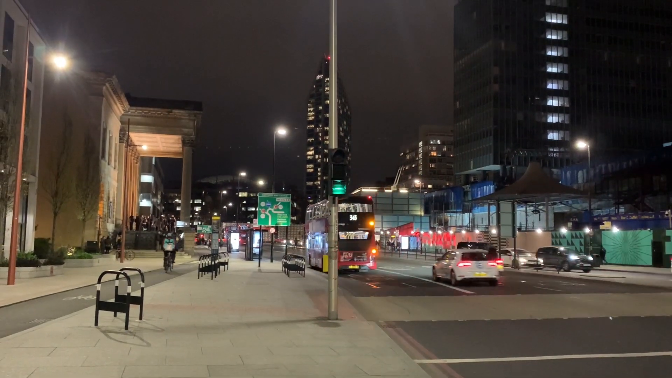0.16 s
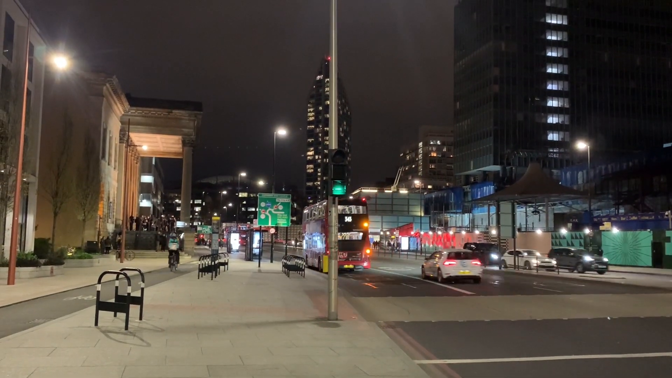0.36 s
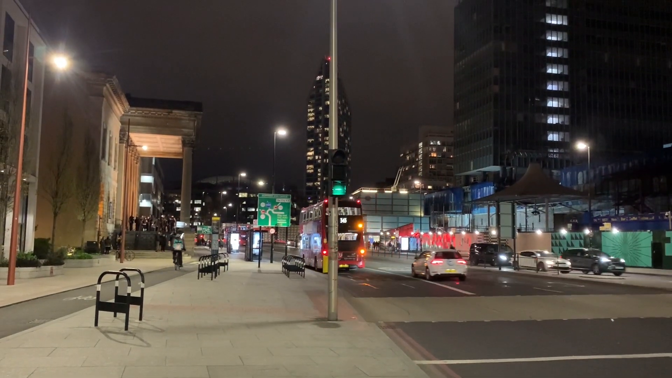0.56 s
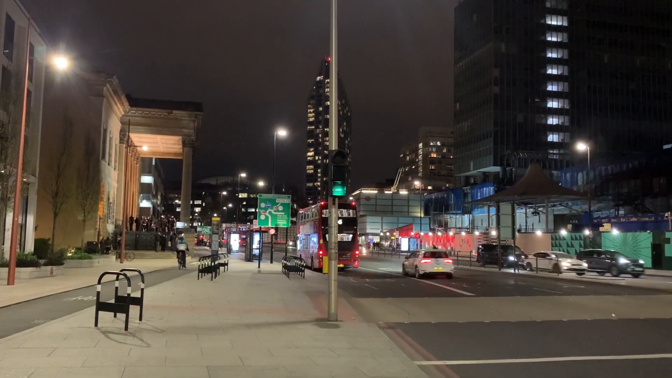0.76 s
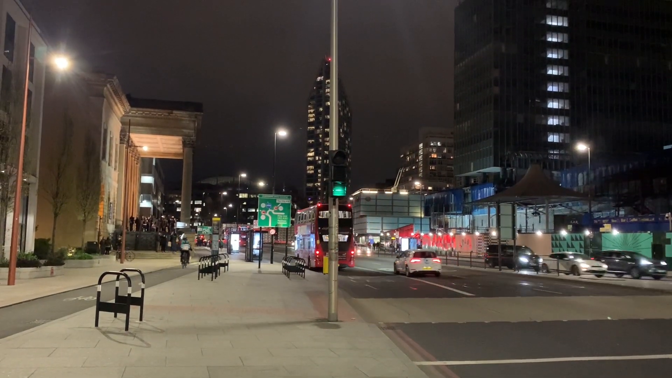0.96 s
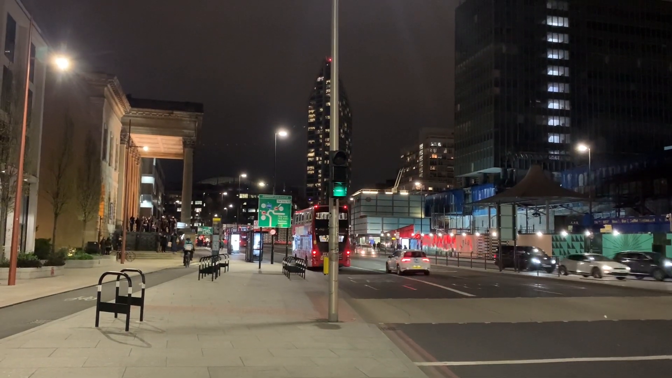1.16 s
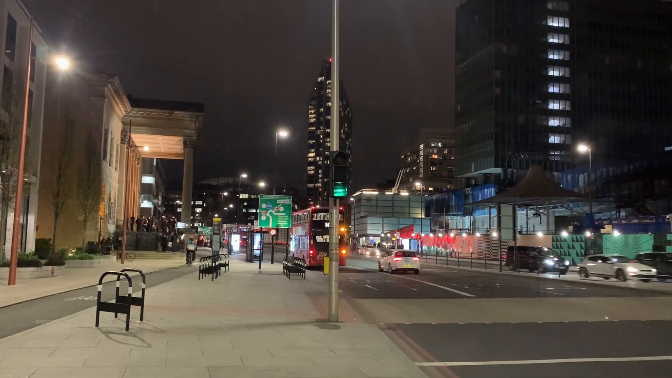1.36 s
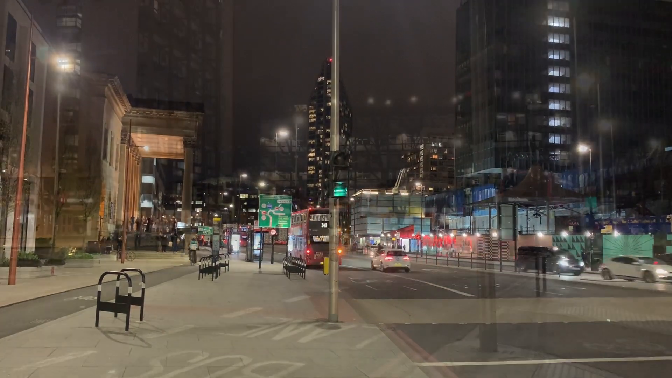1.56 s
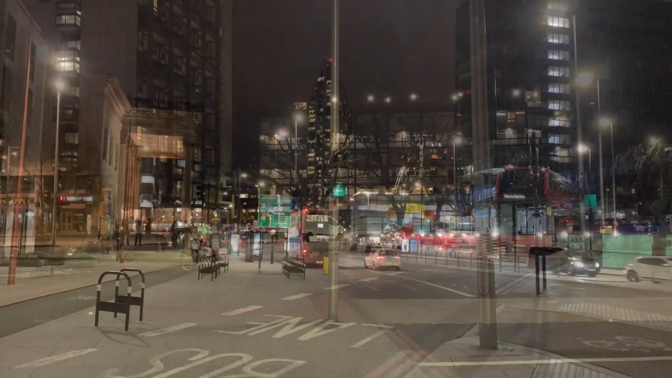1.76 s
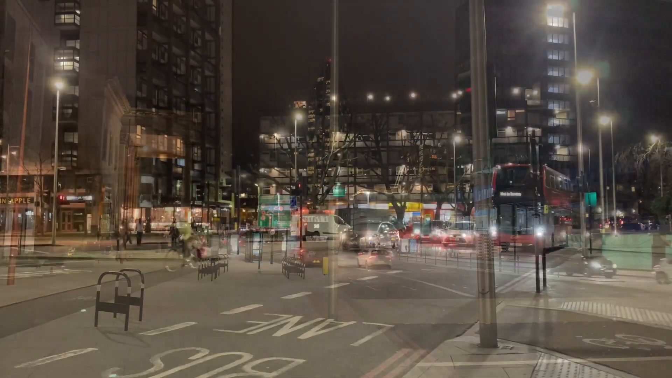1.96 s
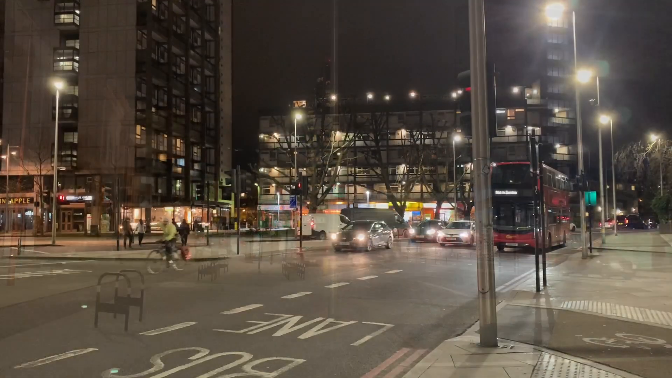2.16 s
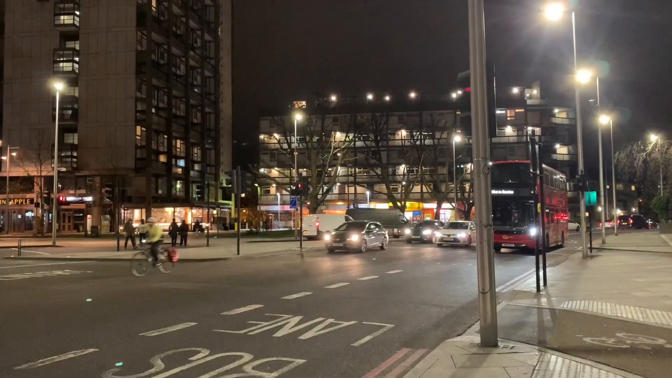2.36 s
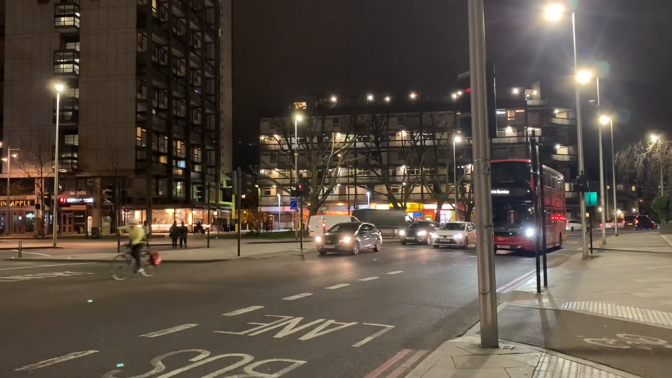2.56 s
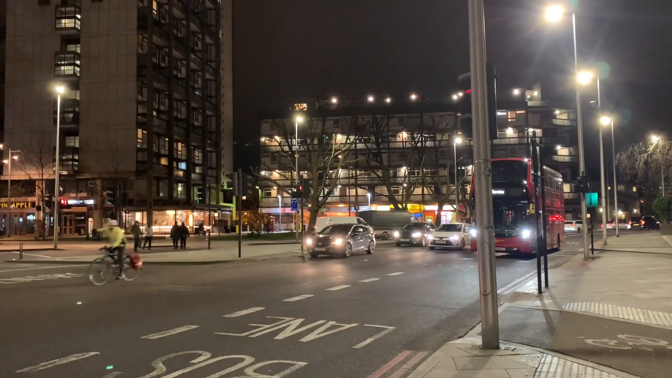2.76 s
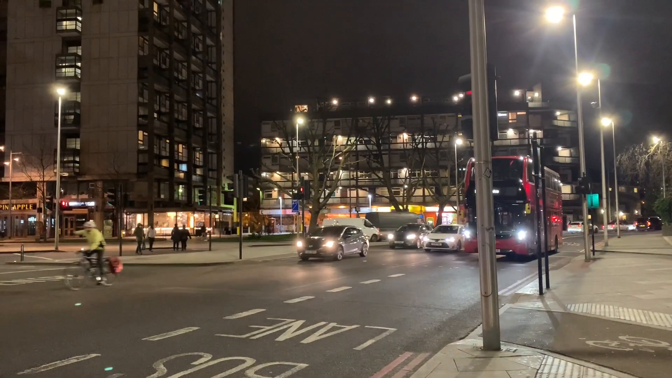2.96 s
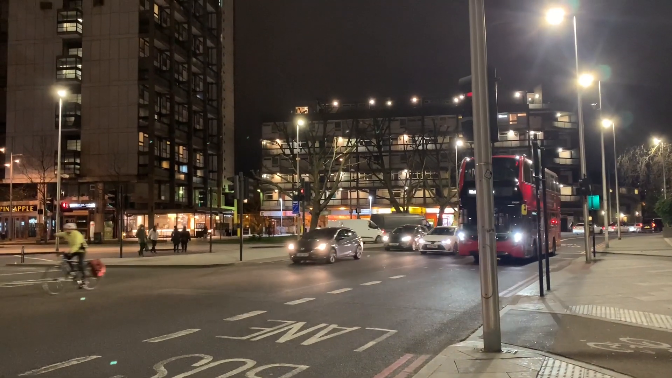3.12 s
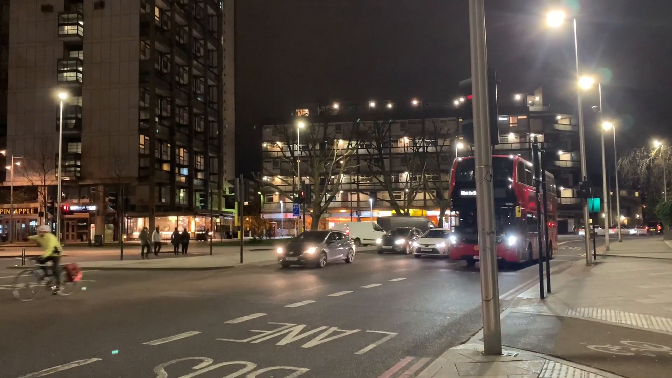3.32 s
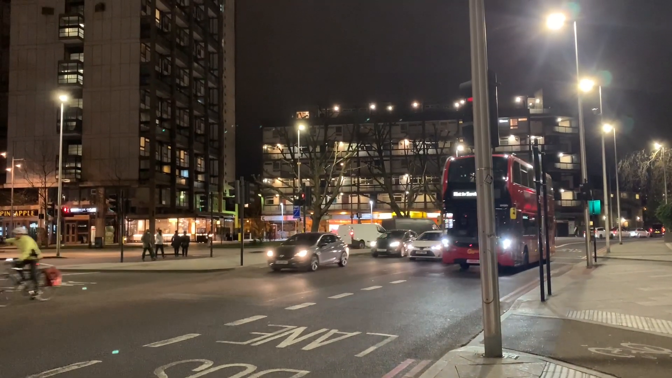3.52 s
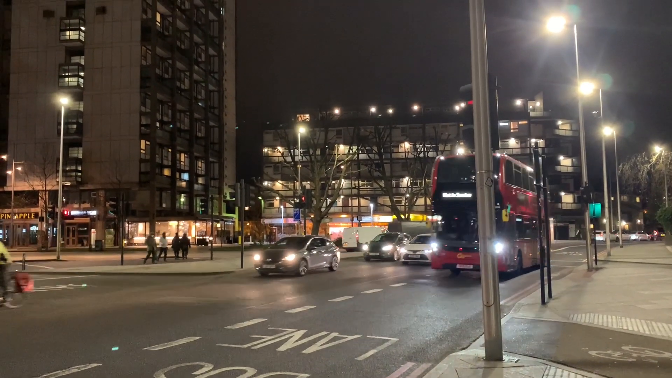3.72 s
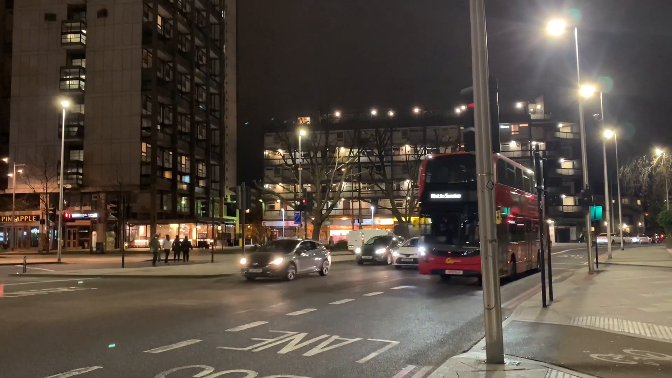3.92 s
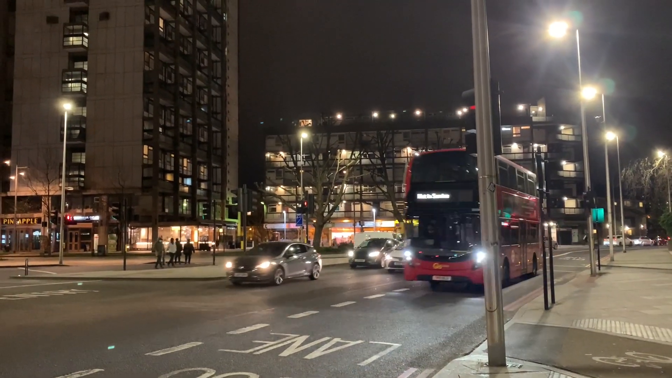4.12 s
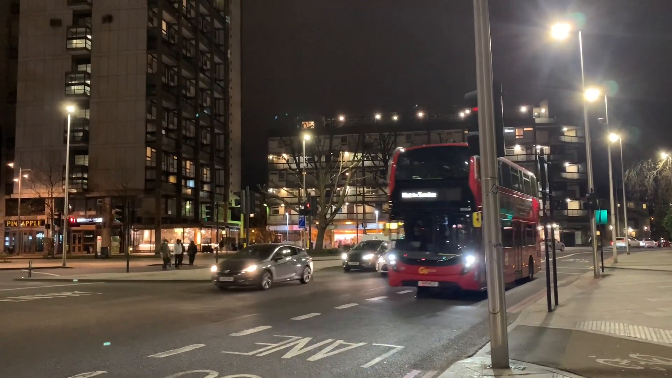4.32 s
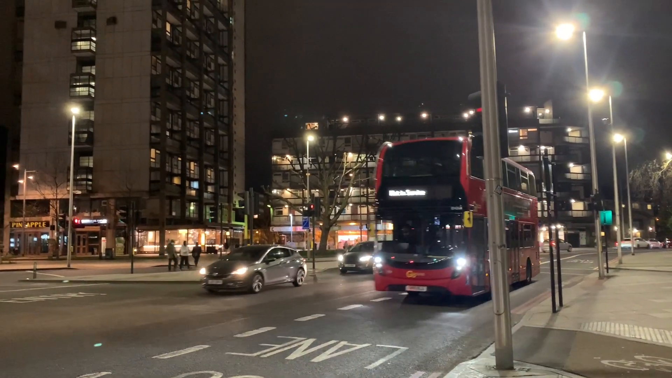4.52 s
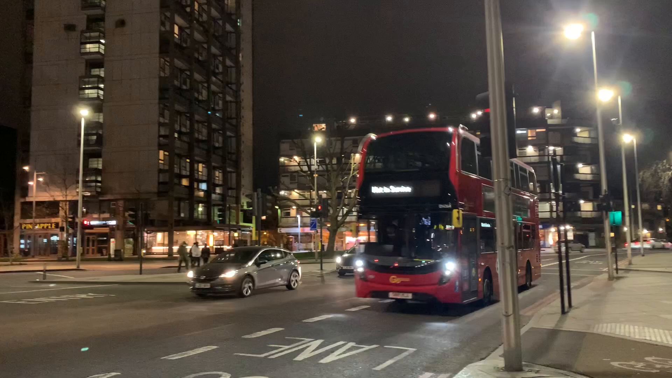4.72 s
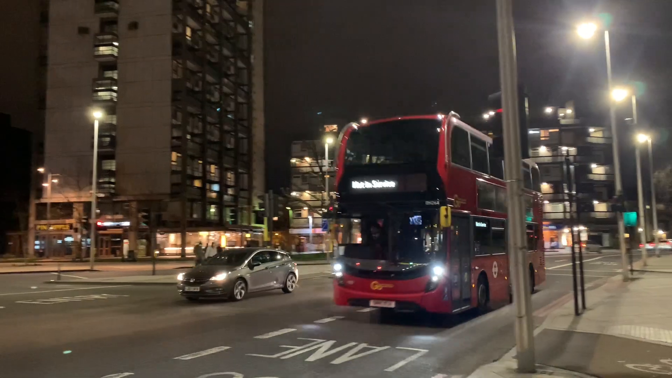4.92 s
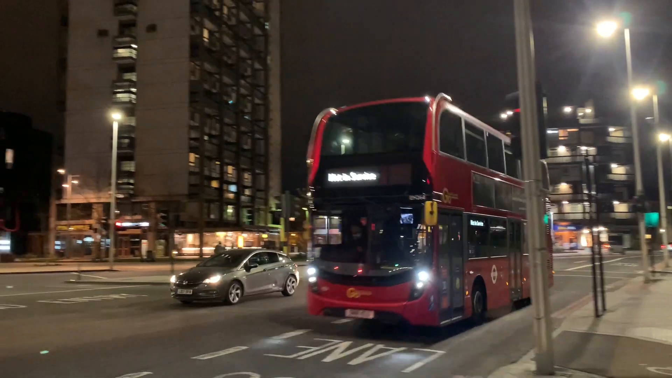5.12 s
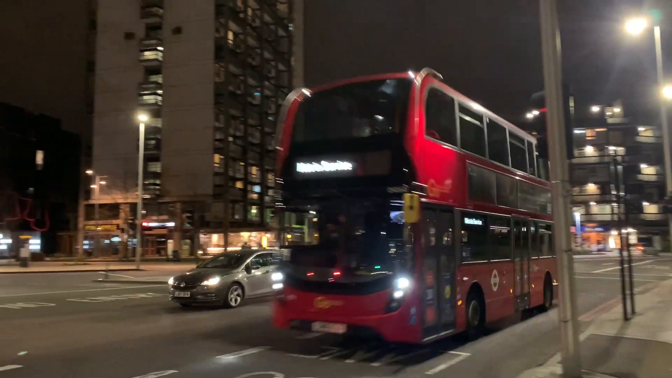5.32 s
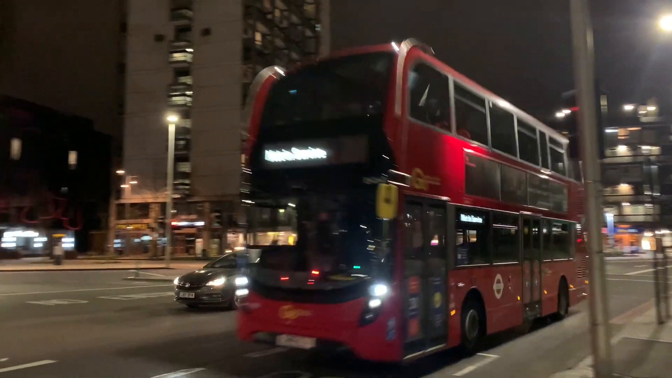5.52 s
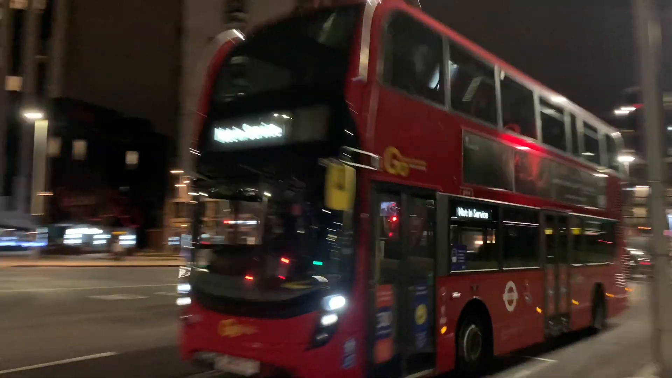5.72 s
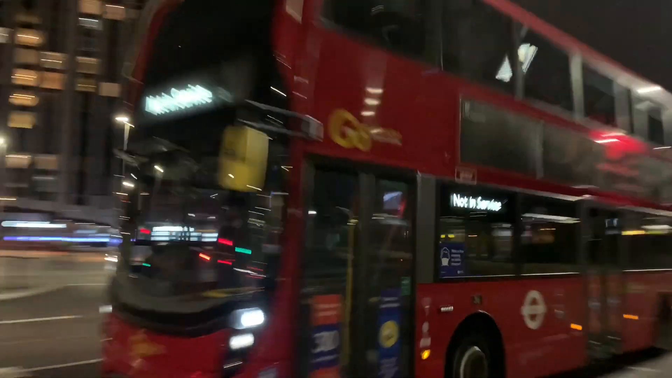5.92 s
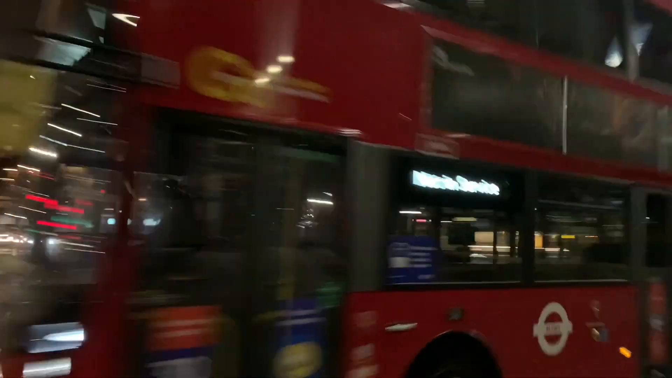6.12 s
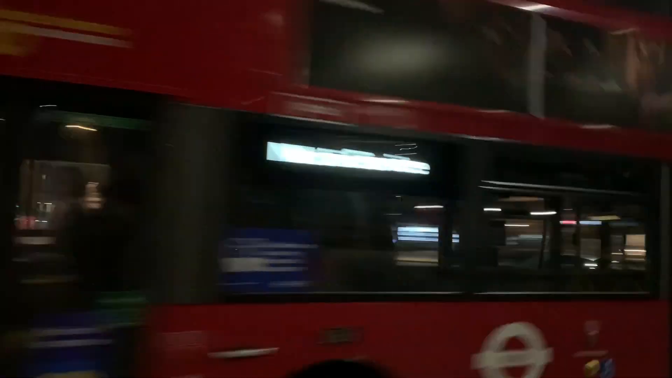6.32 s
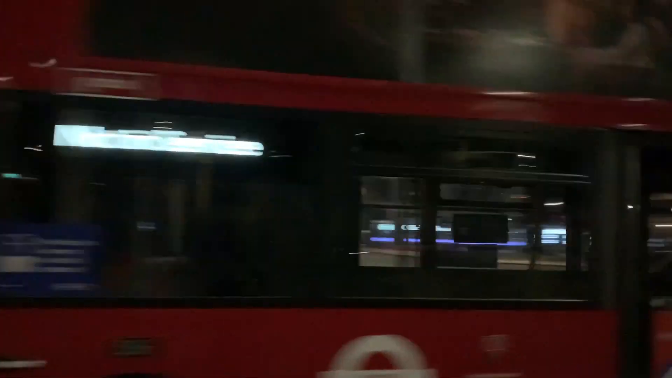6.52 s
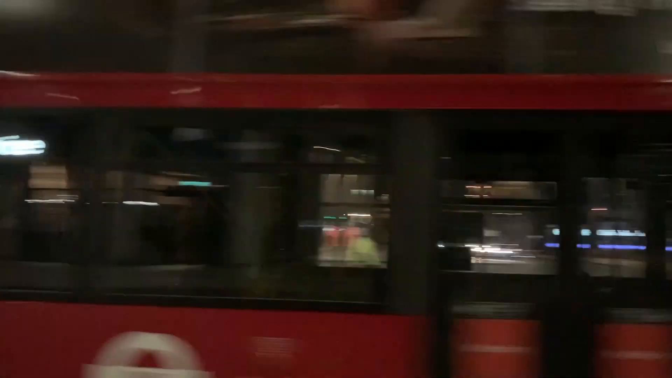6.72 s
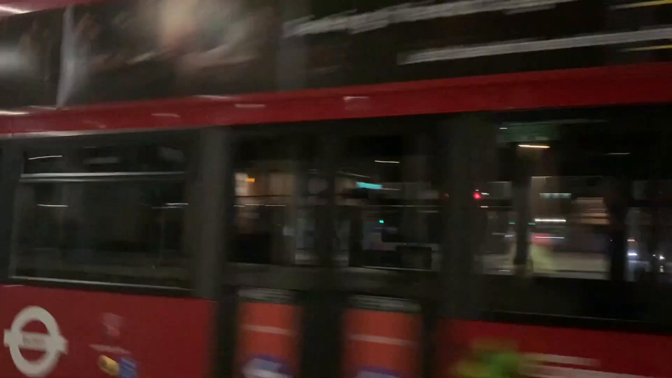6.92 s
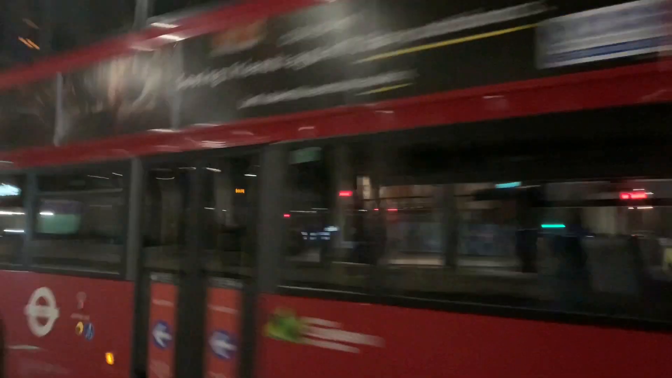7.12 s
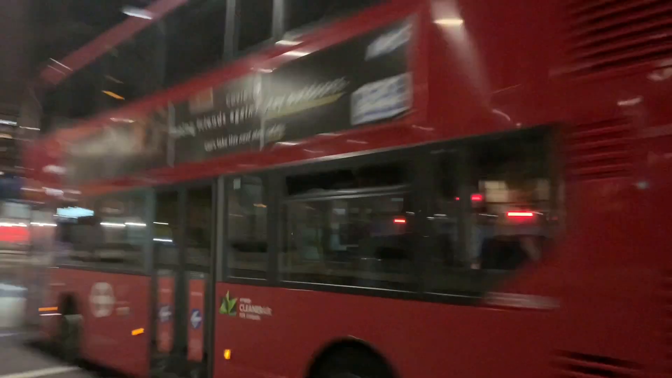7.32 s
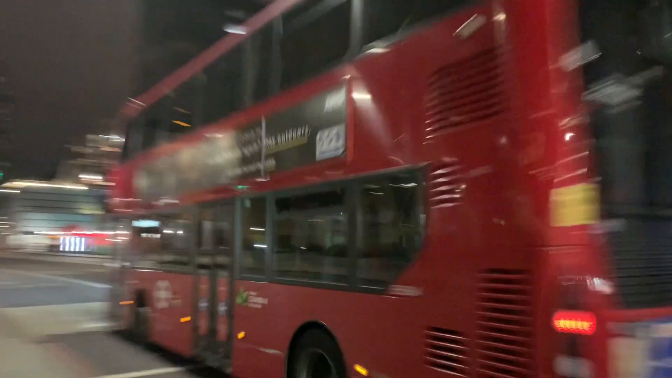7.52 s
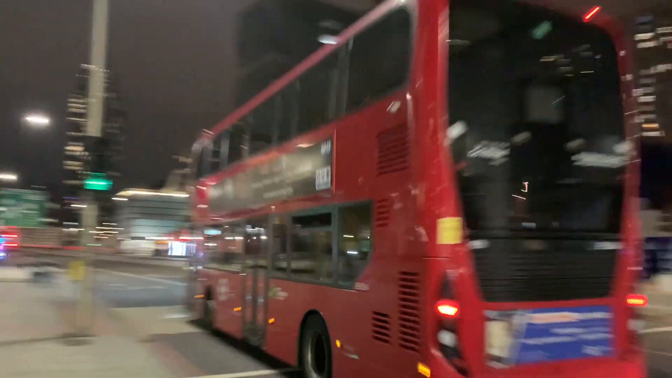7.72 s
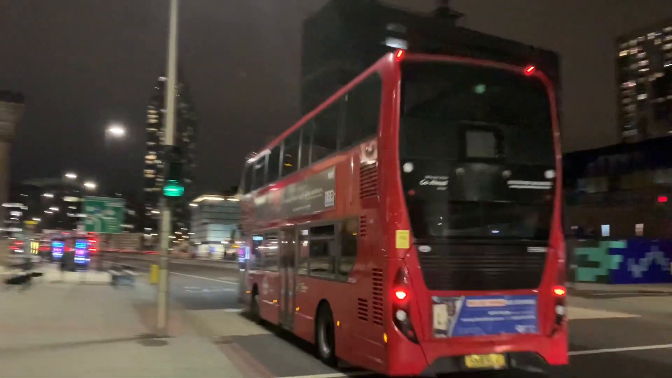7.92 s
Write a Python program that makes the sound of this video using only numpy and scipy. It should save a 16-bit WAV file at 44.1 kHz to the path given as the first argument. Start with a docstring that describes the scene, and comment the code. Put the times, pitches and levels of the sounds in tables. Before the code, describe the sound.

Steady diesel throb and wide traffic wash open the scene, with a faint squeal and a brief tyre swish. They fade under another street's softer drone, dotted with wind bumps and tiny handling clicks. A bus engine builds and a faint whine climbs; hard gusts buffet the phone microphone as the front passes. Body hum, rattly engine rasp and bright airy hiss follow close by, before the pitch sinks and the bus moves off.

```python
"""A double-decker bus comes from afar, gaining speed, and passes close by in a city street at night, its rear
engine last. Before it, a queue of traffic with a steady diesel fades away in another street; distant tyres drone.
Engines are stacks of wavering harmonics; tyres, rumble and hiss are shaped noise; whines are gliding tones.
Gusts thump on a phone's two microphone ports as swells of low noise; ticks and knocks sound nearby."""
import sys
import numpy as np
from scipy import signal
from scipy.fft import rfft, irfft, next_fast_len
from scipy.io import wavfile
from scipy.ndimage import uniform_filter1d, map_coordinates

SR = 44100
rng = np.random.default_rng(int(sys.argv[2]) if len(sys.argv) > 2 else 0)


def dump(signal):
    """Clip the signal to [-1, 1] and save it as 16-bit WAV at the path in sys.argv[1]."""
    limited = np.clip(np.atleast_2d(signal).T, -1, 1)
    pcm = np.round(limited * 32767).astype(np.int16)
    wavfile.write(sys.argv[1], SR, pcm)


N = 351477

# How alike left and right are in the waiting traffic: pitch_hz, likeness (0 to 1)
QUEUE_ALIKE = [(60, 0.96), (290, 0.82), (640, 0.33), (1400, 0.059), (3000, 0.055), (5600, 0.055),
               (6500, 0.83), (8500, 1), (15000, 0.96)]
# How alike left and right are in the bus noise: pitch_hz, likeness (0 to 1)
BUS_ALIKE = [(60, 0.87), (300, 0.98), (800, 0.82), (1200, 0.8), (1700, 0.77), (2400, 0.55), (4000, 0.39),
             (5500, 0.27), (6300, 0.81), (8500, 1), (15000, 0.83)]

# The front of the bus is abreast at FRONT_S, moving at this speed and gaining more, this far to the side
FRONT_S, SPEED_M_S, GAIN_M_S2, KERB_M = 5.964, 6.6, 0.73, 2.92
MONO_HZ = 6100  # above this the noise loses its own left-right lag and a fixed treble lag begins


def amp(db):
    """Turns decibels into a gain."""
    return 10 ** (np.asarray(db) / 20)


def unit(x):
    """Scales a signal to an rms of 1."""
    return x / np.sqrt(np.mean(x ** 2) + 1e-20)


def clock():
    """The time of every sample in seconds."""
    return np.arange(N) / SR


def along(points, hz):
    """Reads a curve of (Hz, value) points on a log pitch axis."""
    f, v = np.transpose(points)
    return np.interp(np.log(hz + 1), np.log(f + 1), v)


def curves(rows, fade):
    """Joins timed rows into curves, led by a gate that opens and closes just outside the rows' span."""
    s, *columns = np.transpose(rows)
    t = clock()
    gate = np.clip(1 + np.minimum(t - s[0], s[-1] - t) / fade, 0, 1)
    return [gate] + [np.interp(t, s, column) for column in columns]


def wobble(rate):
    """A smooth random curve with this many random points a second."""
    points = rng.standard_normal(int(N * rate / SR) + 4)
    return map_coordinates(points, [np.arange(N) * rate / SR])


def ramp(start, end):
    """Rises from 0 to 1 between two times."""
    return np.clip((clock() - start) / (end - start), 0, 1)


def bell(middle, half):
    """A flat-topped swell around a time."""
    return np.exp(-((clock() - middle) / half) ** 4)


def filtered(x, response):
    """Multiplies the spectrum of x by a response that depends on frequency."""
    m = next_fast_len(N + 8192)
    return irfft(rfft(x, m) * response(np.fft.rfftfreq(m, 1 / SR)), m)[..., :N]


def lagging(hz):
    """Every note lags as if higher, by an amount that grows to 500 Hz above a 150 Hz knee."""
    return hz + 500 * hz / (hz + 150)


def half_lag(hz, lag):
    """Half the phase by which left trails right; lag lists time_s, lag_ms."""
    return np.pi * lagging(hz) * np.interp(clock(), *np.transpose(lag)) / 1000


def rush(spectrum, alike, lag, patchy_db):
    """Stereo noise of rms 1, shaped in pitch, with patches of random gain; left hears it late by lag."""
    hz, t, (a, b) = signal.stft(rng.standard_normal((2, N)), SR, nperseg=1024)
    patches = uniform_filter1d(uniform_filter1d(rng.standard_normal(a.shape), 4, 0), 6, 1)
    # Two independent noises are mixed as middle and side for the wanted likeness
    turn = np.arccos(np.clip(along(alike, hz), -1, 1))[:, None] / 2
    mid, side = a * np.cos(turn), b * np.sin(turn)
    lag_s = np.interp(t, *np.transpose(lag)) / 1000
    late = np.exp(-1j * np.pi * np.outer(lagging(hz) * (hz < MONO_HZ), lag_s))
    pair = amp(patchy_db * unit(patches)) * np.array([(mid + side) * late, (mid - side) / late])
    noise = signal.istft(pair, SR, nperseg=1024)[1][:, :N]
    return unit(filtered(noise, lambda f: amp(along(spectrum, f))))


def diesel(firing_hz, orders, waver_db, drift, lag):
    """Harmonics of the firing rate, the higher wavering more as echoes off the street shift."""
    turns = np.cumsum(firing_hz) / SR
    total = 0
    for k, db in orders:
        level = amp(db + waver_db * np.sqrt(k) * wobble(5.7))
        phase = 2 * np.pi * k * turns + drift * k * wobble(5)
        total = total + level * np.sin(phase + np.outer([-1, 1], half_lag(k * firing_hz, lag)))
    return total * np.sqrt(2)


def whine(hz, waver_db, blur_hz, lag):
    """A tone on a pitch curve, wavering in level and blurred by fast random pitch drift."""
    phase = 2 * np.pi * np.cumsum(hz + blur_hz * wobble(400)) / SR
    return amp(waver_db * wobble(11)) * np.sin(phase + np.outer([-1, 1], half_lag(hz, lag)))


def glides(rows, waver_db, blur_hz, lag=((0, 0),)):
    """Tones that swell, glide evenly and fade."""
    total = 0
    for middle, half, hz, slope, db in rows:
        pitch = hz + slope * (clock() - middle)
        total = total + amp(db) * bell(middle, half) * whine(pitch, waver_db, blur_hz, lag)
    return total


def far():
    """Distant tyres on tarmac, strongest in one band, where tread tones waver."""
    # Distant traffic nears, then is hidden by the bus: time_s, level_db
    far_level = [(2, -49.5), (5, -45), (6.2, -39.5), (6.8, -66)]
    # Tyre noise spectrum: pitch_hz, level_db (per Hz)
    far_roar = [(700, -35), (1000, 4.5), (1300, -25), (1530, 0), (1650, 0), (1770, 1.5), (1860, -8.5),
                (2050, -4), (2400, -5), (2700, -12), (4000, -15.5), (6500, -25), (9000, -42)]
    # Left-right likeness: pitch_hz, likeness (0 to 1)
    far_alike = [(1000, 0.42), (1700, 0.48), (2500, 0.56), (5600, 0.14), (6500, 1)]
    # Tread tones in the drone: pitch_hz, level_db (against the roar)
    tread_tones = [(1520, -13), (1660, -7), (1760, -11)]
    gate, db = curves(far_level, fade=0.55)
    drone = rush(far_roar, far_alike, [(0, 0.043)], patchy_db=1.5)
    for hz, level in tread_tones:
        drone = drone + amp(level) * whine(hz + 35 * wobble(3), waver_db=4, blur_hz=40, lag=[(0, .036)])
    return gate * amp(db + [[1], [0]]) * drone


def queue_engine(firing_hz):
    """A steady diesel, whose single harmonics swell for a while, beats with a second close in pitch."""
    # Harmonics: multiple (of the firing rate), level_db
    queue_orders = [(1, -4), (2, -3.5), (3, -7), (4, -8), (5, -12), (6, -14.5), (7, -20), (8, -21.5),
                    (9, -17)]
    # Harmonics that swell: middle_s, half_length_s, pitch_hz, glide_hz_per_s, level_db
    swells = [(1.02, .24, 115.5, 0, -26), (.47, .08, 403, 0, -34), (.82, .07, 404, 0, -33),
              (1.08, .1, 402, 0, -33), (1.36, .15, 401, 0, -32), (1.05, .1, 460, 0, -39),
              (1.32, .08, 458, 0, -38), (.9, .1, 290, 0, -36), (1.0, .3, 172, 0, -33)]
    # A second exhaust: middle_s, half_length_s, pitch_hz, glide_hz_per_s, level_db
    second_exhaust = [(.55, 0.28, 51.64, 0.097, -18.5), (1.33, 0.26, 53.2, 1.53, -21.5)]
    steady = diesel(np.full(N, firing_hz), queue_orders, waver_db=1.26, drift=0.28, lag=[(0, 0)])
    sound = amp(-29.5) * steady
    sound += glides(swells, waver_db=2.5, blur_hz=3.3)
    return sound + glides(second_exhaust, waver_db=1.5, blur_hz=2)


def queue_noise(firing_hz):
    """The wide roar of waiting traffic: low rumble, tyres and hiss, and one car's tyres sweeping by."""
    # Noise spectra, each: pitch_hz, level_db (per Hz)
    low_band = [(15, -39), (25, 2), (43, -3.5), (64, 10.5), (85, -1.5), (114, 5), (500, -9.5), (650, -37),
                (1100, -120)]
    tyre_band = [(250, -38.5), (400, -20), (600, -1.5), (1000, -7.5), (1600, -10.5), (1750, -14),
                 (1950, -8.5), (2200, -16), (2600, -19), (3300, -20), (3700, -23), (5000, -37), (7000, -80)]
    hiss_band = [(3000, -24), (4200, -2), (6000, -8.5), (8500, -6), (11000, -16), (12400, -12.5),
                 (13300, -27), (16000, -15)]
    swish_band = [(1400, -32), (1900, 2), (2200, 3), (2400, 5), (2620, 5), (2780, -14), (3600, -39)]
    t = clock()
    knock = 1 + 0.1 * np.sin(2 * np.pi * firing_hz * t)  # each firing swells the tyre noise
    tyres = amp(-30.5 - 0.82 * t) * amp([[.5], [-.5]]) * knock
    sound = amp(-25.5) * rush(low_band, QUEUE_ALIKE, [(0, 0.0087)], patchy_db=2.0)
    sound += tyres * rush(tyre_band, QUEUE_ALIKE, [(0, 0.13)], patchy_db=2.0)
    sound += amp(-47.6 - 4.3 * t) * rush(hiss_band, QUEUE_ALIKE, [(0, 0.018)], patchy_db=1.5)
    swish = amp(-39.5) * bell(.68, 0.17)
    return sound + swish * rush(swish_band, QUEUE_ALIKE, [(0, 0.096)], patchy_db=2.5)


def queue():
    """Waiting traffic: diesel tones over a wide, diffuse roar, with a faint gliding squeal."""
    # The squeal rises and settles: middle_s, half_length_s, pitch_hz, glide_hz_per_s, level_db
    squeal = [(.12, .15, 3160, 350, -46), (.5, .28, 3210, 50, -51), (1.1, .06, 3100, 600, -53)]
    firing_hz = 57.13
    sound = queue_engine(firing_hz) + queue_noise(firing_hz)
    return sound + glides(squeal, waver_db=1.5, blur_hz=45) * amp([[1], [-4]])


def thumps():
    """Gusts are short swells of low turbulence, partly unlike in the two ports; harder ones are brighter."""
    # Gusts on the microphones: middle_s, level_db, length_s
    gusts = [(2.35, -25.5, 0.029), (2.539, -21.5, 0.023), (2.607, -28, 0.07), (2.818, -25, 0.04),
             (3.529, -21.5, 0.02), (3.69, -17.5, 0.057), (3.86, -28, 0.13), (4.17, -29.5, 0.05),
             (4.797, -33, 0.05), (6.024, -21, 0.037), (6.129, -15, 0.027), (6.173, -10.5, 0.03),
             (6.219, -12, 0.044), (6.277, -14.5, 0.044), (6.362, -20, 0.034), (6.534, -16.5, .04),
             (6.899, -17, 0.039)]
    # Turbulence spectrum: pitch_hz, level_db (per Hz)
    gust_band = [(20, -58), (38, -9), (55, 12.5), (100, 1), (200, -3), (330, -12.5), (450, -23), (600, -46),
                 (900, -101)]
    brightens_hz = 44.7  # at full scale a gust gains 6 dB an octave above this
    t = clock()
    air = rush(gust_band, [(60, .8), (400, .7)], [(0, 0)], patchy_db=0)
    # Even out the strength within a gust
    power = np.abs(uniform_filter1d(np.mean(air ** 2, 0), SR // 25))
    air = air / np.sqrt(power + 0.029)
    gust = sum(amp(db) * np.exp(-((t - s) / length) ** 2 * 2) for s, db, length in gusts)
    bright = np.gradient(air, axis=1) * SR / (2 * np.pi * brightens_hz)
    return gust * (air + gust * bright)


def ticks():
    """Each tick is a dying puff of noise in one band."""
    # Ticks: start_s, level_db, pitch_hz, width_hz, t60_s (time to die by 60 dB)
    tick_rows = [(2.085, -52, 12400, 1500, .04), (2.087, -55, 15300, 900, .03),
                 (2.18, -61, 9800, 610, 0.085), (2.183, -63, 12400, 900, 0.3), (2.36, -65, 12500, 900, .12),
                 (2.779, -53, 10000, 6000, .008), (2.98, -64, 11900, 600, .2),
                 (3.517, -53, 9500, 4012, .01)]
    out, t = np.zeros(N + SR), np.arange(SR // 5) / SR
    f = np.fft.rfftfreq(len(t), 1 / SR)
    for s, db, hz, width_hz, t60 in tick_rows:
        band = np.exp(-((f - hz) / width_hz) ** 2 * 2)
        puff = unit(irfft(rfft(rng.standard_normal(len(t))) * band, len(t)))
        onset = 1 - np.exp(-t / (0.063 * t60))
        out[round(s * SR):][:len(t)] += amp(db - 60 * t / t60) * onset * puff
    # The right copy starts a little later, before the treble lag is applied
    return np.array([out[:N], np.roll(out, 9)[:N]])


def knocks():
    """Each small dull knock rings two short modes, a little differently in pitch each time."""
    # Knocks: start_s, level_db
    knock_rows = [(.977, -18), (1.015, -17), (2.37, -24), (2.566, -18), (5.506, -15), (5.591, -15)]
    # Modes: pitch_hz (before the random shift), level_db, t60_s (time to die by 60 dB)
    modes = [(790, 0, .016), (2100, -8, .012)]
    out, t = np.zeros(N + SR), np.arange(SR // 20) / SR
    shifts = rng.standard_normal((len(knock_rows), 2))
    for (s, db), pair in zip(knock_rows, shifts):
        ring = 0
        for (hz, level, t60), shift in zip(modes, pair):
            pitch = hz * (1 + .04 * shift)
            ring = ring + amp(level - 60 * t / t60) * np.sin(2 * np.pi * pitch * t)
        out[round(s * SR):][:len(t)] += amp(db) * (1 - np.exp(-t / .001)) * ring
    return np.array([out[:N], np.roll(out, 4)[:N]])  # the right copy starts slightly later


def travelled(t):
    """Metres by which the front of the bus has passed, under steady acceleration."""
    return SPEED_M_S * (t - FRONT_S) + GAIN_M_S2 / 2 * (t - FRONT_S) ** 2


def passing(spots):
    """Gain of a layer from spots along the bus: behind_front_m, abreast_db, loss_db (per doubled distance)."""
    front = travelled(clock())
    power = 0
    for m, db, loss_db in spots:
        distance = np.hypot(1, (front - m) / KERB_M)
        power = power + amp(db - loss_db * np.log2(distance)) ** 2
    return np.sqrt(power)


def bearing():
    """Rows of time_s, lag_ms: left lags most while the middle of the bus is abreast."""
    ahead_ms, abreast_ms, behind_ms = 0.089, 0.21, 0.017
    abreast_m, swing_m = 6.5, 3.9
    t = np.linspace(0, N / SR, num=81)
    past = (travelled(t) - abreast_m) / swing_m
    away = np.where(past < 0, ahead_ms, behind_ms)
    return np.transpose([t, away + (abreast_ms - away) * np.exp(-past ** 2)])


def motor():
    """The drive motor's two thin whines, locked to one shaft as it speeds up."""
    # Shaft whines: time_s, lower_pitch_hz, lower_level_db, upper_level_db
    motor_rows = [(3.35, 3700, -68, -82), (3.72, 3980, -67, -80), (3.82, 4070, -76, -79),
                  (3.88, 4125, -58, -78), (4.03, 4260, -64, -78), (4.15, 4370, -58, -78),
                  (4.3, 4520, -64, -76), (4.68, 4825, -64, -74), (4.8, 4890, -75, -70),
                  (5.1, 5130, -66, -66), (5.4, 5380, -65, -69), (5.7, 5570, -68, -68),
                  (6.0, 5760, -64, -59), (6.3, 5890, -66, -58)]
    on, hz, low_db, high_db = curves(motor_rows, fade=.05)
    low = amp(low_db) * whine(hz, waver_db=1.5, blur_hz=30, lag=[(4.7, .03), (5.1, .085)])
    high = amp(high_db) * whine(1.097 * hz, waver_db=3.5, blur_hz=30, lag=[(5.6, .08), (5.9, .02)])
    return on * (low + high)


def bus_whistles():
    """The turbo's blurred whistle, faint whines and the drive motor."""
    # Turbo whistle: time_s, pitch_hz
    turbo_pitch = [(4.5, 14500), (5.3, 15150), (6, 15400), (6.8, 15600), (7.1, 14860)]
    # Where it sounds from: behind_front_m, abreast_db, loss_db (per doubled distance)
    turbo_at = [(5.21, -44, 9)]
    # Faint whines: middle_s, half_length_s, pitch_hz, glide_hz_per_s, level_db
    faint_whines = [(5.6, .35, 3400, 0, -59), (7.6, .5, 6600, -34, -62)]
    spun_up, turbo_hz = curves(turbo_pitch, fade=.25)
    sound = spun_up * passing(turbo_at) * whine(turbo_hz, waver_db=1.2, blur_hz=300, lag=[(0, 0)])
    faint = glides(faint_whines, waver_db=-2.0, blur_hz=38.4, lag=[(0, 0.024)])
    return sound + faint * amp([[1.2], [-1.2]]) + motor()


def bus_tyres(lag):
    """Tyre roar from along the bus, and a short surge from the front tyres."""
    # Tyre spectrum: pitch_hz, level_db (per Hz)
    tyre_roar = [(180, -14), (300, -2.5), (404, -11), (471, -6.5), (564, -6), (809, -5), (1400, -16.5),
                 (1820, -20), (3080, -120)]
    # Where it sounds from: behind_front_m, abreast_db, loss_db (per doubled distance)
    tyres_at = [(2.8, -26, 9), (7.8, -19.5, 7.5)]
    surge = amp(-33.5) * bell(5.73, 0.09)
    sound = surge * rush(tyre_roar, BUS_ALIKE, lag, patchy_db=0.5)
    roar = rush(tyre_roar, BUS_ALIKE, lag, patchy_db=1.5)
    return sound + passing(tyres_at) * amp([[-.3], [.3]]) * roar


def bus_body(lag):
    """Body rumble, drumming panels and grille noise, with hums that mostly sink as the body goes by."""
    # Noise spectra, each: pitch_hz, level_db (per Hz)
    rumble_band = [(15, -53), (25, -15.5), (41, 1), (59, 0), (86, -1.5), (113, -3), (144, -8.5), (450, -25),
                   (580, -81), (990, -120)]
    panel_band = [(110, -41), (170, -3.5), (230, -1.5), (320, -3), (390, -9.5), (480, -6.5), (560, -12),
                  (680, -23), (900, -80)]
    grille_band = [(1700, -30), (1900, -8), (1990, 3), (2160, 6), (2230, -3), (2410, -25), (2520, -4),
                   (2600, 0), (2820, -3), (3000, -28), (3400, -57)]
    # Where each sounds from: behind_front_m, abreast_db, loss_db (per doubled distance)
    rumble_at = [(2.8, -17.5, 7.5), (8.6, -19.5, 9.5)]
    panels_at = [(4.8, -32.5, 12), (8.5, -20.5, 8)]
    grille_at = [(10.8, -33, 13)]
    # Hums: middle_s, half_length_s, pitch_hz, glide_hz_per_s, level_db
    hums = [(6.61, 0.08, 338, 0, -20), (6.79, .06, 325, 0, -20), (7.08, .14, 326, -30, -23),
            (7.42, .12, 310, -50, -24), (7.7, .25, 294, -10, -31), (6.95, .14, 256, -120, -22),
            (7.35, .12, 210, -50, -26), (7.8, 0.3, 228, -40, -30), (7.0, 0.3, 473, -25, -26),
            (7.8, 0.16, 470, 0, -32), (6.8, .07, 528, 0, -28)]
    rumble = np.hypot(passing(rumble_at), amp(-33))  # the street's own low rumble lies beneath
    sound = rumble * rush(rumble_band, BUS_ALIKE, lag, patchy_db=3.0)
    sound += passing(panels_at) * rush(panel_band, BUS_ALIKE, lag, patchy_db=1.5)
    sound += passing(grille_at) * rush(grille_band, [(2400, 1.0)], lag, patchy_db=1.5)
    return sound + glides(hums, waver_db=1.5, blur_hz=8, lag=lag)


def bus_engine(lag):
    """Exhaust harmonics follow the firing rate, which also pulses the engine-bay rasp and the air hiss."""
    # Engine: time_s, firing_rate_hz, tone_db
    firing = [(2.4, 50.3, -53), (2.9, 54.27, -30.5), (3.25, 55.8, -34.5), (3.6, 56.4, -30),
              (3.9, 56.48, -34.5), (4.15, 57.1, -29), (5.3, 58.9, -28.5), (6.1, 61.7, -25.5),
              (6.4, 62, -26), (6.6, 61, -25), (6.8, 57.67, -25), (7.05, 56.88, -21.5), (7.3, 53.25, -24),
              (7.55, 50.74, -24.5), (7.97, 46.7, -26.5)]
    # Harmonics, all along and then near the exhaust: multiple (of the firing rate), level_db
    bus_orders = [(1, 3.5), (2, -9), (3, -11.5), (4, -17), (5, -23.5), (6, -27.5)]
    close_orders = [(2, -6), (3, -8), (4, -2)]
    # Noise spectra, each: pitch_hz, level_db (per Hz)
    rasp_band = [(800, -46), (1150, -4), (1500, -5), (1900, -5), (2140, -8), (2320, -8), (2420, -14.5),
                 (2520, -7), (2950, -12.5), (3500, -12.5), (5000, -20.5), (7000, -64.5)]
    hiss_band = [(2500, -21), (4000, -3.5), (5200, -3), (6500, 1.5), (8500, 0), (11000, 1), (11900, 2),
                 (12500, 7.5), (12800, 5), (13050, -6), (14500, -2), (16000, -0.5)]
    # Where each sounds from: behind_front_m, abreast_db, loss_db (per doubled distance)
    exhaust_at = [(8.9, -29.5, 10)]
    rasp_at = [(3.4, -29.5, 21.6), (9.3, -23, 10.54)]
    hiss_at = [(3.9, -34.5, 73), (6.4, -28.5, 15.2), (9.5, -25, 13.2)]
    near, firing_hz, tone_db = curves(firing, fade=0.32)
    knock = 1 + 0.078 * np.sin(2 * np.pi * np.cumsum(firing_hz) / SR)
    sound = near * amp(tone_db) * diesel(firing_hz, bus_orders, waver_db=1.5, drift=0.25, lag=lag)
    sound += passing(exhaust_at) * diesel(firing_hz, close_orders, waver_db=1.5, drift=0.36, lag=lag)
    rasp = passing(rasp_at) * amp([[-.25], [.25]]) * knock
    sound += rasp * rush(rasp_band, BUS_ALIKE, lag, patchy_db=2.5)
    hiss = passing(hiss_at) * amp(0.6 * wobble(8)) * knock
    return sound + hiss * rush(hiss_band, BUS_ALIKE, lag, patchy_db=1.5)


def bus():
    """The passing bus: engine, tyres and body share its moving bearing; the whistles keep their own lags."""
    lag = bearing()
    return bus_whistles() + bus_tyres(lag) + bus_body(lag) + bus_engine(lag)


def scene():
    """The first street fades out as the second fades in; gusts, ticks and knocks are at the phone."""
    first_street = (1 - ramp(1.334, 2.26)) * queue()
    second_street = ramp(1.24, 2.24) * (far() + bus())
    return first_street + second_street + thumps() + ticks() + knocks()


def record(dry):
    """Softly clips peaks, cuts deep bass, shades and delays the ports, and keeps nothing above a limit."""
    # The phone's body shades one port or the other: pitch_hz, right_over_left_db
    port_shade = [(300, 0), (400, -1), (520, -2.5), (680, 2), (830, -1), (1200, 0), (3000, 0), (3500, 0),
                  (4200, 5), (4800, 0.5), (5600, 8), (5950, 11), (6400, -2), (7000, 0)]
    bass_cut_hz, top_hz = 30, 15770
    port_ms = 0.21  # the right port leads by this much in the treble
    held = dry / (1 + np.abs(dry / .88) ** 6) ** (1 / 6)

    def response(hz):
        """Port shading, bass cut, treble lag and top limit together."""
        shade = amp(np.outer([-1, 1], along(port_shade, hz)) / 2)
        bass_cut = (1j * hz / (bass_cut_hz + 1j * hz)) ** 3
        lag = np.exp(1j * np.pi * np.outer([-1, 1], np.maximum(hz - MONO_HZ, 0) * port_ms / 1000))
        return shade * bass_cut * lag * (hz < top_hz)

    return filtered(held, response)


dry = scene()
out = record(dry)
dump(out)
```